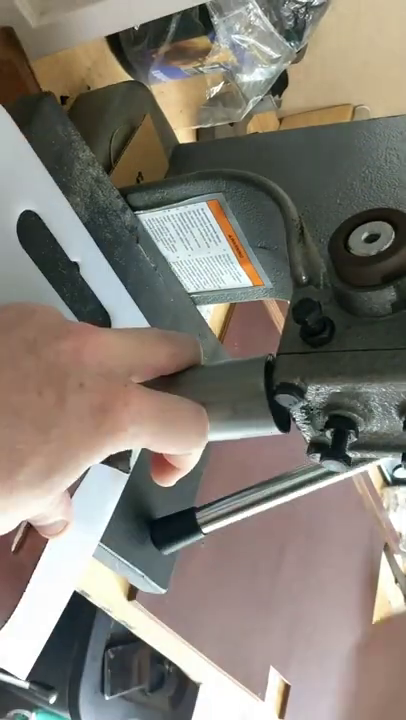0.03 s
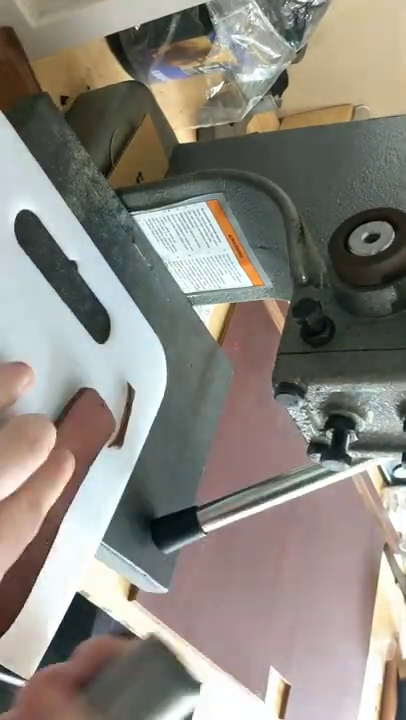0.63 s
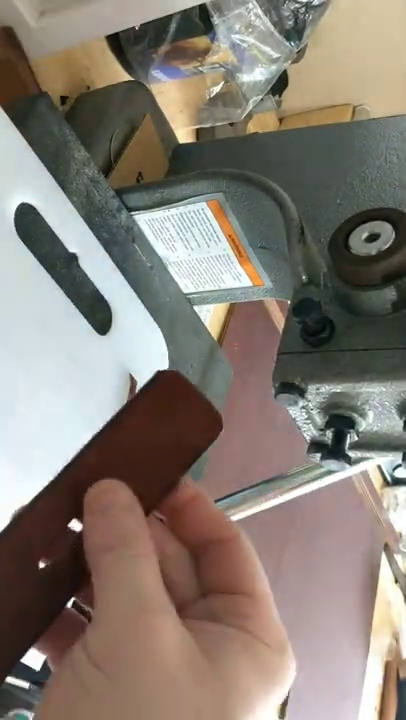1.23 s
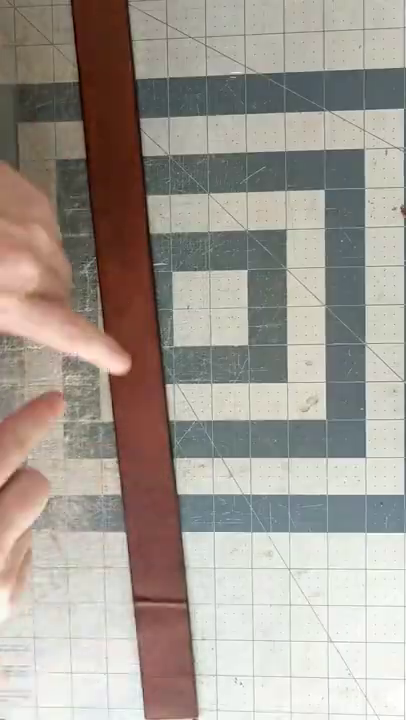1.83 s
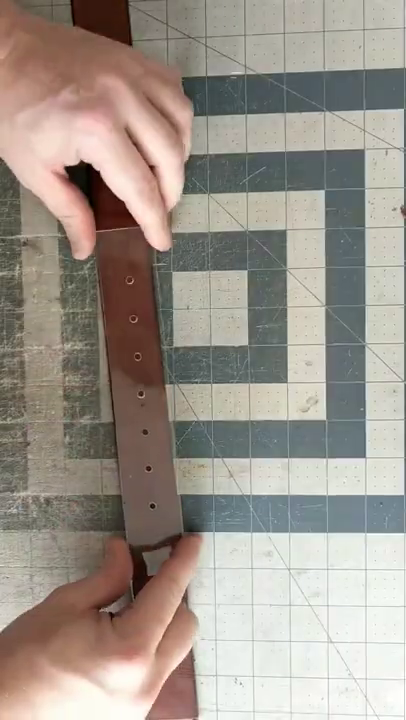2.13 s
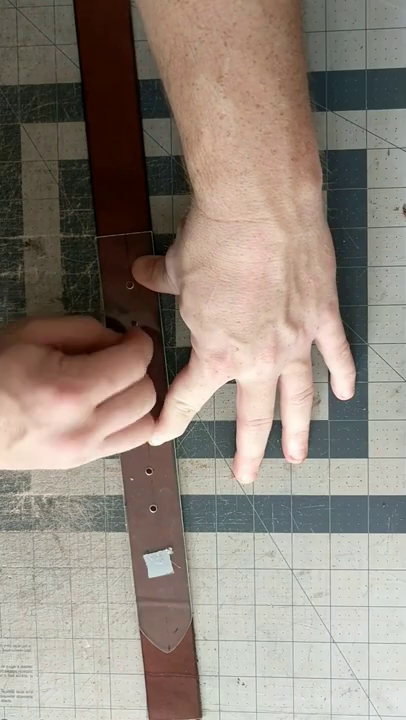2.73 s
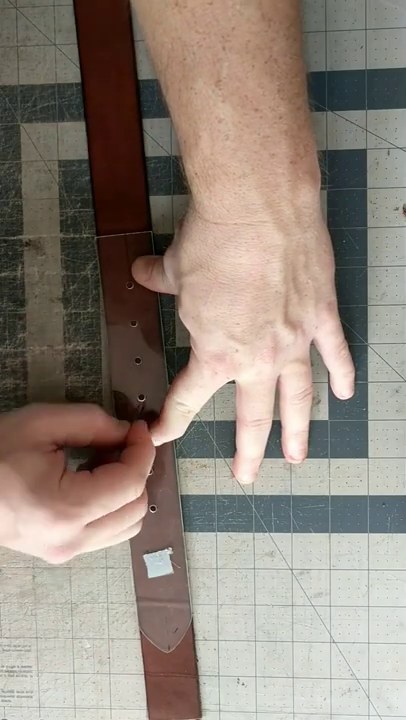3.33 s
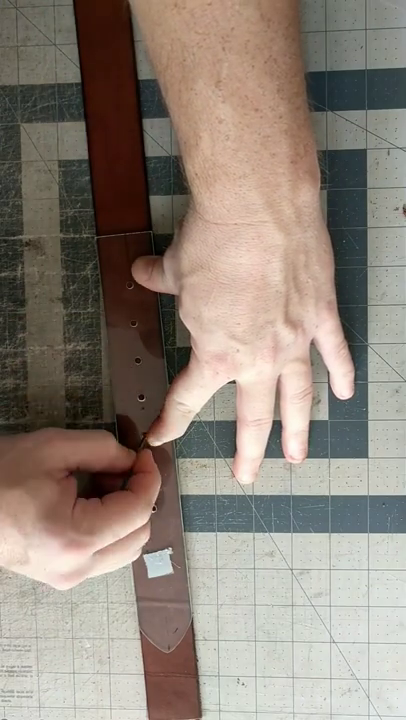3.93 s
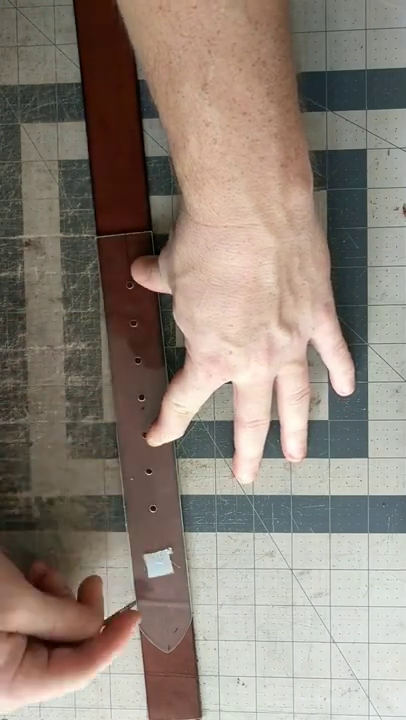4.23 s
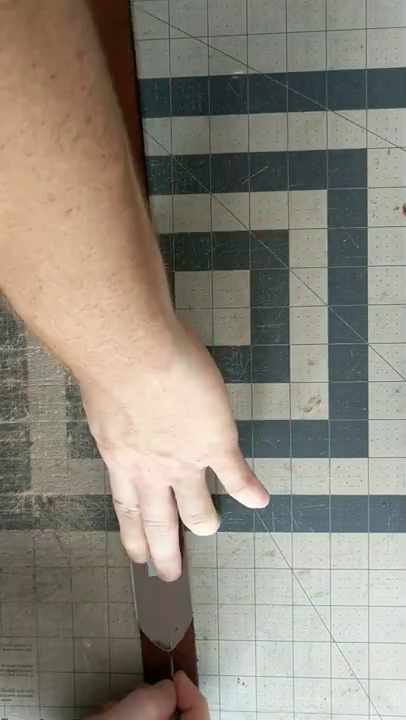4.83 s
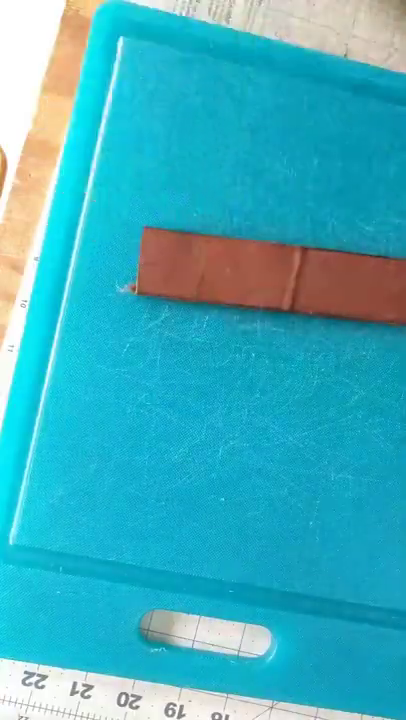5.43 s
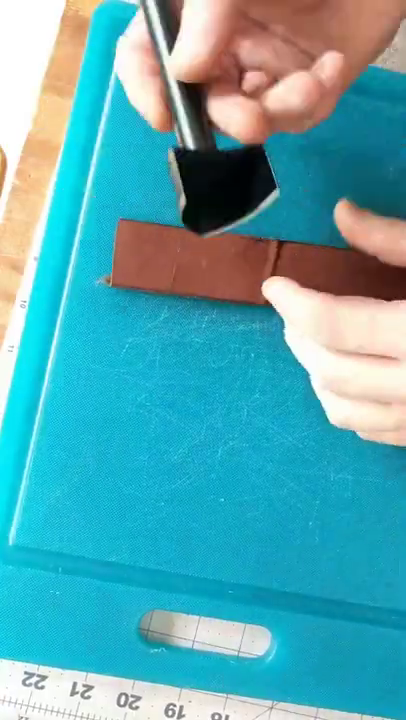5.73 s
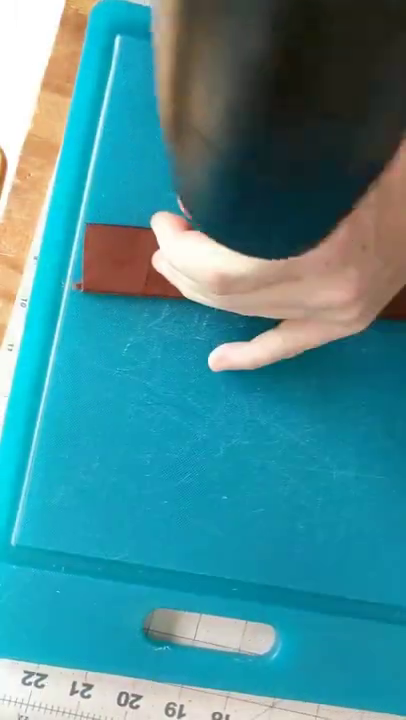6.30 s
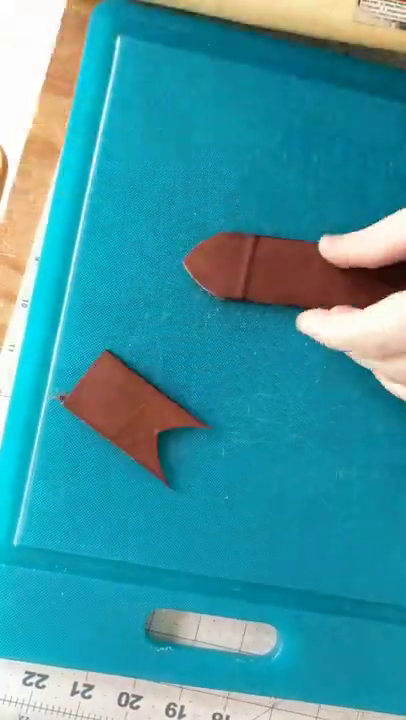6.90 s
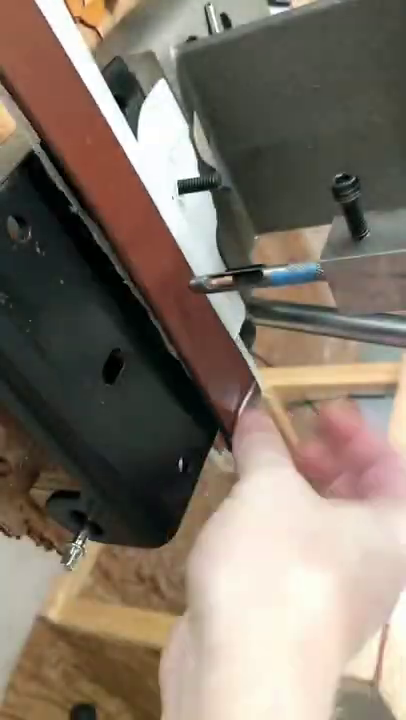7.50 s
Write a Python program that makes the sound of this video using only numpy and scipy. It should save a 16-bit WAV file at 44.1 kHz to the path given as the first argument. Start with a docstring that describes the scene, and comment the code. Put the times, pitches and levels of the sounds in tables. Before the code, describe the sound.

A close microphone picks up faint, steady workshop hiss with a thin whine and a quiet, low machine hum. Soft handling knocks come in the first half second, and a steel tube gives one short, bright tap at about 0.5 seconds. The hum stops at around 1.6 seconds. A leather strap slides over a mat in faint, grainy swishes with small dull bumps until about 2.5 seconds, followed by only a few slight scuffs. Just after 5 seconds the strap slides again and lightly slaps a plastic cutting board. At about 6.2 and 6.4 seconds, two mallet blows drive a punch through the leather: solid thuds with a sharp crack and a brief bench shudder, by far the loudest sounds. At 6.7 seconds the punch comes free with a lighter knock. Low microphone bumps and soft rubbing follow around 7.3 to 7.5 seconds.

```python
"""Soft knocks and the tap of a steel tube sound over a humming machine in a small leather workshop.
The hum stops; a strap slides over a mat with stick-slip friction and slaps onto a plastic cutting board.
Two mallet blows, the loudest events, drive an end punch through the leather and excite the damped modes
of punch, board and bench. The punch is rocked free with a knock, and a hand bumps the microphone.
Steady room noise and a faint whine lie underneath."""
import sys
import numpy as np
from scipy import signal
from scipy.io import wavfile

SR = 44100
rng = np.random.default_rng(int(sys.argv[2]) if len(sys.argv) > 2 else 0)


def wav_record(signal):
    """Record a signal, one row per channel, as 16-bit PCM in the file named by sys.argv[1]."""
    frames = np.transpose(np.atleast_2d(signal))
    bounded = np.clip(frames, -1, 1)
    # unit amplitude maps onto the largest positive 16-bit level
    quanta = np.round(bounded * 32767).astype(np.int16)
    wavfile.write(sys.argv[1], SR, quanta)


N = 333396
TIME = np.arange(N) / SR
AGE = TIME[:SR * 3 // 4]   # time since a contact [s]
EDGES_HZ = 22 * 2 ** np.arange(0, 9.6, .5)
BANK = [(np.sqrt(low * high), signal.butter(2, [low, high], "band", fs=SR, output="sos"))
        for low, high in zip(EDGES_HZ, EDGES_HZ[1:])]
# friction spectrum: (frequency [Hz], relative level per octave [dB])
RUB = [(200, -19.5), (600, -13.5), (1200, -9.5), (2300, -6), (3300, -2.5), (5000, -16.5), (14000, -29.5)]


def from_db(db):
    """Amplitude ratio of a level in decibels."""
    return 10 ** (np.asarray(db) / 20)


def rms_one(x):
    """Normalisation to unit rms."""
    return x / np.sqrt(np.mean(x ** 2) + 1e-20)


def add(out, s, sound):
    """Superposition of a sound starting at s seconds."""
    at = max(0, round(s * SR))
    out[at:at + len(sound)] += sound[:max(0, N - at)]


def low_pass(x, hz, order=2):
    """Butterworth attenuation above a cutoff."""
    return signal.sosfilt(signal.butter(order, min(hz, .45 * SR), fs=SR, output="sos"), x)


def drift(rate):
    """Random fluctuation of unit rms, interpolated between `rate` values a second."""
    knots = rng.standard_normal(int(N / SR * rate) + 2)
    return rms_one(np.interp(TIME * rate, np.arange(len(knots)), knots))


def band_noise(table, size=len(AGE)):
    """Spectral shaping in half-octave bands; a t60 column adds frequency-dependent damping."""
    hz, level_db, *t60 = np.transpose(table)
    white, out = rng.standard_normal((2, size + SR // 10)), np.zeros(size)
    for k, (centre_hz, sos) in enumerate(BANK):
        db = np.interp(np.log(centre_hz), np.log(hz), level_db)
        if t60:
            db = db - 60 * TIME[:size] / np.interp(np.log(centre_hz), np.log(hz), t60[0])
        band = rms_one(signal.sosfilt(sos, white[k % 2])[-size:])
        out += band * from_db(db) / np.sqrt(2)   # half an octave holds half the power
    return out


def resonant_noise(hz, width_hz, size):
    """Narrow-band noise of unit rms: random modulation of a carrier that may glide."""
    wobble = low_pass(rng.standard_normal((2, size)), width_hz / 2)
    phase = 2 * np.pi * np.cumsum(hz * np.ones(size)) / SR
    return rms_one(wobble[0] * np.cos(phase) + wobble[1] * np.sin(phase))


def rise(time_constant_s):
    """Exponential build-up after a contact."""
    return 1 - np.exp(-AGE / time_constant_s)


def fade(t60):
    """Exponential decay, 60 dB in t60 seconds."""
    return from_db(-60 * AGE / t60)


def ring(modes, contact_s):
    """Free vibration: damped modes of alternating polarity build up over the contact time."""
    partials = sum((-1) ** k * from_db(db) * fade(t60) * np.sin(2 * np.pi * hz * AGE)
                   for k, (hz, db, t60) in enumerate(modes))
    return partials * rise(contact_s)


def heave(hz, length_s):
    """Heavy damping: a body swings briefly and stops."""
    t = AGE[AGE < length_s]
    return np.sin(2 * np.pi * hz * t) * np.sqrt(np.sin(np.pi * t / length_s))


def with_echo(x, delay_s=.0078, echo_db=-17):
    """Early reflection: a near wall returns a duller copy."""
    delayed = np.interp(AGE - delay_s, AGE, x, left=0)
    return x + from_db(echo_db) * low_pass(delayed, 2500)


def light_impacts(contacts, modes, tail_db):
    """Impulse response of a small object: each contact excites its modes and a short noise tail."""
    out = np.zeros(N)
    for s, db in contacts:
        tail = from_db(tail_db) * rms_one(band_noise(RUB)) * fade(0.063)
        add(out, s, from_db(db) * (ring(modes, contact_s=0.00028) + tail))
    return out


def mallet(thump_lag_s=0.0021, cut_lag_s=.003, stop_db=-15, stop_hz=420):
    """Impact excitation: the bench heaves, then the punch shears the leather and stops on the board."""
    # mallet on punch: (time [s], blow level [dB], thump level [dB], crack level [dB], room level [dB])
    blows = [(6.2083, 0, -11.5, -1, -4), (6.3872, -3, -13, -7.5, -4)]
    # coupled modes of punch, board and bench: (frequency [Hz], level [dB], t60 [s])
    board = [(136.3, -29.5, 0.23), (174.6, -21, 0.2), (233, -28, 0.11), (249, -45.5, 1), (297, -22.5, 0.24),
             (423, -19.5, 0.13), (537.7, -22, 0.14), (782, -26.5, 0.13), (1047, -16, 0.044),
             (1136, -22, 0.058), (1268, -30.5, 0.092), (1462, -33.5, .12), (1740, -29, .08),
             (1960, -36.5, .15), (2703, -37.5, 0.031), (3150, -42.5, 0.13)]
    # dense vibration of the laden bench: (frequency [Hz], level per octave [dB], t60 [s])
    shudder = [(24.73, -52, 0.22), (50, -29, .22), (110.6, -28.5, 0.17), (220, -32.5, 0.14),
               (380, -16, 0.17), (620, -21.5, .1), (998, -21.5, 0.086), (2200, -32.5, 0.27),
               (4200, -46, 0.048), (6430, -60, 0.056), (14000, -59, 0.064)]
    # the edge shearing leather: (frequency [Hz], level per octave [dB], t60 [s])
    crack = [(40, -59.5, .01), (600, -22, .012), (1500, -26.5, 0.01), (2600, -16, 0.012),
             (4600, -33, 0.0094), (6500, -42, 0.0054), (9000, -39, 0.0023), (15000, -32.5, .0025)]
    # reverberation: (frequency [Hz], level per octave [dB], t60 [s])
    room = [(25, -57, .4), (50, -37, 0.59), (130, -34, 0.4), (330, -23, 0.29), (900, -29, 0.36),
            (2397, -41.5, 0.41), (4010, -64.5, 0.33), (6500, -69, 0.15), (14000, -79.5, .11)]
    # the board landing after a hop: (time [s], level [dB])
    hops = [(6.2295, -17), (6.233, -8), (6.4265, -18)]
    out = np.zeros(N)
    for s, blow_db, thump_db, crack_db, room_db in blows:
        body = with_echo(ring(board, contact_s=.0003)) + band_noise(shudder) * rise(0.0013)
        add(out, s, from_db(blow_db) * body)
        add(out, s + thump_lag_s, from_db(thump_db) * heave(hz=124, length_s=0.016))
        add(out, s + cut_lag_s, from_db(crack_db) * band_noise(crack))
        add(out, s + cut_lag_s, from_db(blow_db + stop_db) * heave(stop_hz, .5 / stop_hz))
        add(out, s, from_db(room_db) * band_noise(room) * rise(.011))
    for s, db in hops:
        add(out, s, from_db(db) * low_pass(band_noise(crack, SR // 20), 6000, order=3))
    return out


def punch_release(snap_hz=800, top_hz=7500):
    """Sudden release: the punch snaps out of the board and rings in its natural modes."""
    # the punch coming free: (time [s], level [dB], relative snap level [dB])
    releases = [(6.7083, -3, -10)]
    # punch modes: (frequency [Hz], level [dB], t60 [s])
    modes = [(129.4, -39.5, 0.17), (400, -27, 0.1), (467, -19.5, 0.037), (680, -49, 0.014),
             (990, -34, 0.063), (1425, -27.5, 0.041), (2020, -27.5, 0.015), (2750, -22.5, 0.014),
             (4840, -36.5, 0.018)]
    # noise tail of the knock: (frequency [Hz], level per octave [dB], t60 [s])
    tail = [(60, -66, .15), (198, -46, 0.24), (446, -32.5, 0.15), (900, -31, 0.13), (1700, -49, 0.2),
            (3000, -39, 0.037), (6000, -46.5, 0.032), (14000, -86, .05)]
    out = np.zeros(N)
    for s, db, snap_db in releases:
        knock = with_echo(ring(modes, contact_s=0.00014)) + band_noise(tail) * rise(0.00096)
        add(knock, 0, -from_db(snap_db) * heave(snap_hz, 1 / snap_hz))
        add(out, s, from_db(db) * low_pass(knock, top_hz))
    return out


def steel_tube():
    """Modal ringing: a steel tube taps the table."""
    # taps: (time [s], level [dB])
    taps = [(0.4789, 1), (0.507, -25)]
    # tube modes: (frequency [Hz], level [dB], t60 [s])
    modes = [(1100, -52.5, 0.19), (1050, -28.5, 0.0087), (1783, -25.5, 0.023), (2730, -36.5, 0.014),
             (3460, -34, 0.0092), (4670, -43, 0.0089), (5860, -47.5, 0.0088)]
    return light_impacts(taps, modes, tail_db=-53)


def strap_slap():
    """Strong damping: the modes of the strap end die within milliseconds of hitting the board."""
    # slaps: (time [s], level [dB])
    slaps = [(5.2760, 9), (5.284, -6)]
    # strap modes: (frequency [Hz], level [dB], t60 [s])
    modes = [(1080, -50.5, 0.014), (1910, -58, .018), (2580, -47, 0.0084), (2980, -51, 0.012),
             (3550, -51.5, 0.016), (4560, -48, 0.013), (6070, -40.5, 0.0023)]
    return light_impacts(slaps, modes, tail_db=-56)


def bench_nudges():
    """Modal excitation depends on position: each nudge of tube or strap favours other bench modes."""
    # nudges: (time [s], level [dB])
    nudges = [(0.235, -48), (.2398, -54), (.2715, -63), (.3405, -55), (0.355, -53), (0.4641, -57.5)]
    # bench modes: (frequency [Hz], level [dB], t60 [s])
    bench = [(248, 5.5, 0.1), (625, -14, 0.099), (767, -7.5, 0.11), (984, -2, 0.1), (1257, -3, 0.057),
             (1540, -7.5, 0.043), (1765, 0.5, 0.042), (2675, -7.5, 0.046)]
    out = np.zeros(N)
    for s, db in nudges:
        modes = [(hz, level_db + rng.normal(0, 3.6), t60) for hz, level_db, t60 in bench]
        add(out, s, from_db(db) * ring(modes, contact_s=0.00057))
    return out


def soft_knocks():
    """A compliant contact acts as a low-pass filter: the softer the touch, the duller the knock."""
    # fingers and tools: (time [s], level [dB], t60 [s], cutoff [Hz])
    knocks = [(0.22, -51, 0.27, 1690), (0.233, -47.5, 0.17, 2440), (0.324, -48.5, 0.037, 1490),
              (0.3413, -40.5, 0.028, 2490), (.354, -42.5, 0.071, 1230), (.385, -52.5, 0.036, 2600),
              (0.4654, -46.5, 0.09, 1750), (0.722, -59, 0.28, 1180), (.9, -57, 0.11, 400),
              (0.969, -57, .09, 450), (1.617, -52, 0.05, 1820), (5.63, -53.5, 0.037, 2020),
              (6.17, -39.5, 0.0075, 10000), (6.175, -52, 0.35, 2187), (7.21, -51, 0.026, 3530)]
    # knock spectrum: (frequency [Hz], relative level per octave [dB])
    colour = [(25, -39.5), (70, -11), (220, 1.5), (500, -5), (1000, -1.5), (2200, 2), (5000, -7.5),
              (14000, -5)]
    out, size = np.zeros(N), SR // 5
    for s, db, t60, cutoff_hz in knocks:
        body = rms_one(low_pass(band_noise(colour, size), cutoff_hz, order=5))
        envelope = fade(t60) * rise(0.00089)
        add(out, s, from_db(db) * body * envelope[:size])
    return out


def low_bumps(cycles=1.5):
    """Structure-borne sound: bumps pass through bench and microphone and leave a rumble."""
    # bumps: (time [s], level [dB], frequency [Hz])
    bumps = [(1.681, -51, 95), (1.71, -54, 122), (2.262, -54, 90), (2.287, -52, 130), (5.125, -56, 110),
             (5.182, -50, 90), (7.334, -44, 62), (7.407, -44, 62), (7.4428, -33, 94.5), (7.5, -46, 75),
             (7.5321, -33, 122), (7.548, -41.5, 90)]
    # rumble: (frequency [Hz], level per octave [dB], t60 [s])
    rumble = [(30, -17, 0.33), (70, -13, .25), (140, -12.5, .17), (238, -14.5, 0.23), (600, -56, 0.062),
              (2000, -70, .05)]
    out, size = np.zeros(N), SR // 5
    for s, db, hz in bumps:
        add(out, s, from_db(db) * heave(hz, cycles / hz))
        add(out, s, from_db(db) * band_noise(rumble, size) * rise(0.0077)[:size])
    return out


def sliding_leather(swell_db=15, hiss_swell_db=18, glide_octaves_per_s=0.81, width_hz=300,
                    upper_ratio=1.32, upper_db=-3):
    """Stick-slip friction: a grainy rub and hiss, with two resonances rising as the free end shortens."""
    # strokes: (time of peak speed [s], rise time [s], fall time [s], rub level [dB],
    #           swish level [dB], hiss level [dB], swish frequency [Hz])
    strokes = [(0.219, 0.29, 0.34, -67.5, -70, -96, 1404), (.45, 0.058, 0.38, -65.5, -79, -74, 1600),
               (1.065, 0.095, 0.083, -64, -56, -67, 2067), (1.652, .08, 0.084, -67, -65.5, -73, 1330),
               (1.724, .08, 0.032, -64, -64, -62.5, 2900), (2.03, 0.2, .2, -65.5, -70, -74, 1653),
               (2.19, .17, .18, -72, -67, -86, 2003), (4.229, 0.052, .05, -73, -74, -85, 1320),
               (4.48, .15, .17, -72, -76, -92, 1048), (5.118, .15, 0.087, -60, -67, -61.5, 2420),
               (5.19, 0.043, .19, -65, -67, -90, 2576), (7.287, 0.055, .11, -70, -69, -77, 1995),
               (7.518, 0.029, 0.047, -66.5, -66, -69.5, 2890)]
    # fine friction hiss: (frequency [Hz], relative level per octave [dB])
    hiss_spectrum = [(1000, -53), (3000, -6), (5000, 0), (8000, -11), (14000, -19)]
    # fingertips scuffing the leather: (time [s], level [dB])
    scuffs = [(1.271, -67), (1.975, -70), (2.48, -67), (3.851, -62.5), (7.345, -67.5)]
    out = np.zeros(N)
    for s, rise_s, fall_s, rub_db, swish_db, hiss_db, hz in strokes:
        t = np.arange(-2 * rise_s, 2 * fall_s, 1 / SR)
        slowness = np.maximum(-t / rise_s, t / fall_s)   # 0 where the stroke is fastest
        glide_hz = hz * 2 ** (glide_octaves_per_s * t)
        lower = resonant_noise(glide_hz, width_hz, len(t))
        upper = resonant_noise(upper_ratio * glide_hz, upper_ratio * width_hz, len(t))
        swish = from_db(swish_db) * rms_one(lower + from_db(upper_db) * upper)
        rub = from_db(rub_db) * rms_one(band_noise(RUB, len(t)))
        hiss = from_db(hiss_db) * rms_one(band_noise(hiss_spectrum, len(t)))
        stroke = from_db(-swell_db * slowness) * (rub + swish) + from_db(-hiss_swell_db * slowness) * hiss
        add(out, s + t[0], stroke[s + t >= 0])
    for s, db in scuffs:
        add(out, s, from_db(db) * rms_one(band_noise(hiss_spectrum)) * fade(0.14) * rise(0.0028))
    roughness_db = 2.0 * drift(rate=350) + 2.2 * drift(rate=45)   # fine grains and slower catches
    return out * rms_one(from_db(roughness_db))


def machine_hum(hz=119.7, rms_db=-61.5, stop_s=1.59, waver_rad=.12):
    """Forced vibration: a motor radiates one tone of wavering phase until it stops."""
    running = np.clip((stop_s - TIME) / 0.011, 0, 1)
    phase = 2 * np.pi * hz * TIME + waver_rad * drift(rate=15)
    return np.sqrt(2) * from_db(rms_db) * running * np.sin(phase)


def room_air(hiss_db=-76):
    """Ambient noise: a steady broadband floor, with narrow bands heard as a hiss and a thin whine."""
    # noise floor: (frequency [Hz], level per octave [dB])
    air = [(30, -90.5), (60, -75.5), (115, -69), (190, -72.5), (320, -72), (700, -81), (1400, -79.5),
           (2800, -77), (4300, -71), (5600, -81), (8500, -82.5), (11800, -88), (15000, -89.5)]
    # faint whines: (start time [s], frequency [Hz], level [dB], duration [s])
    whines = [(0, 7200, -84, 1.59), (6.45, 6820, -87, .67), (7.12, 7620, -87, .44), (0, 11700, -94, 7.56)]
    out = band_noise(air, N) + from_db(hiss_db) * resonant_noise(hz=4250, width_hz=900, size=N)
    for s, hz, db, length_s in whines:
        add(out, s, from_db(db) * resonant_noise(hz, width_hz=240, size=round(length_s * SR)))
    return out


def scene():
    """Superposition of all sources at one close microphone."""
    impacts = mallet() + punch_release() + steel_tube() + strap_slap()
    handling = bench_nudges() + soft_knocks() + low_bumps() + sliding_leather()
    return (impacts + handling + room_air() + machine_hum())[None]


def record(dry, bass_hz=24, top_hz=15900):
    """Band limiting: the microphone loses the deepest bass and the top is cut; the level dips briefly."""
    # level dips: (time [s], half width [s], gain [dB])
    dips = [(0.807, 0.0051, -56), (3.038, 0.0068, -19), (4.683, 0.0059, -15)]
    dip_db = sum(db * np.exp(-((TIME - s) / width) ** 2) for s, width, db in dips)
    thinned = signal.sosfilt(signal.butter(2, bass_hz, "high", fs=SR, output="sos"), dry)
    top_cut = signal.ellip(10, .1, 80, top_hz, fs=SR, output="sos")
    return signal.sosfilt(top_cut, thinned * from_db(dip_db))


dry = scene()
out = record(dry)
wav_record(out)
```